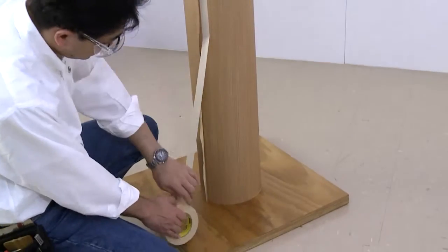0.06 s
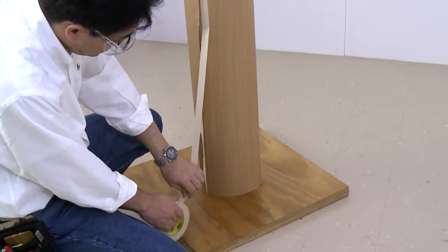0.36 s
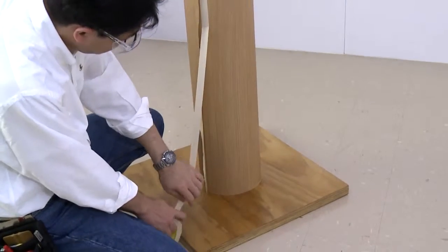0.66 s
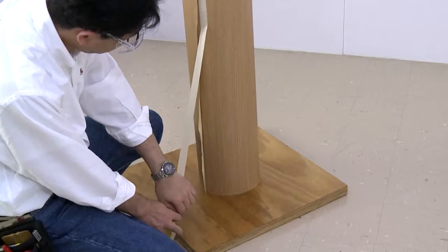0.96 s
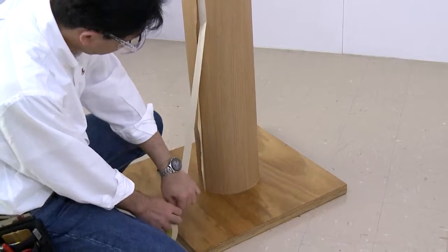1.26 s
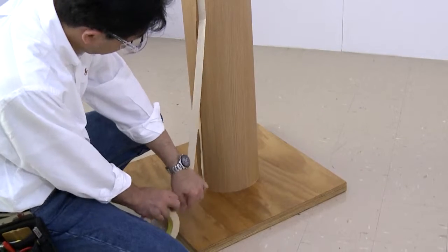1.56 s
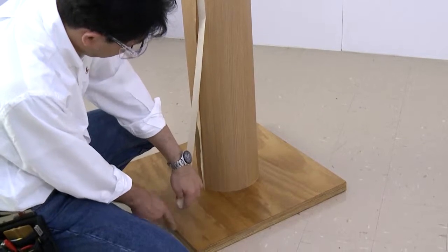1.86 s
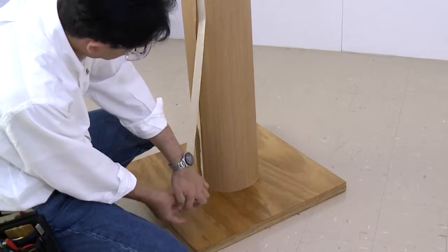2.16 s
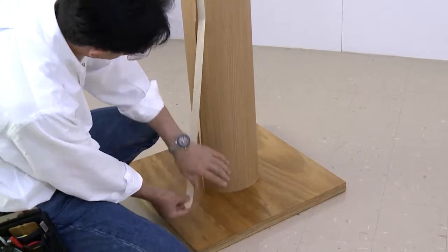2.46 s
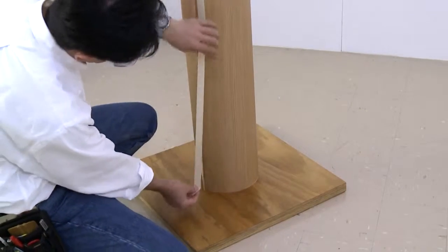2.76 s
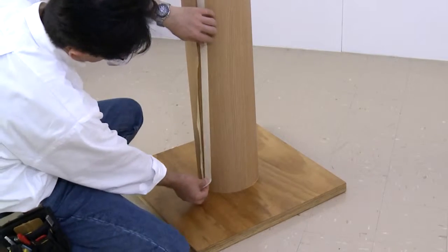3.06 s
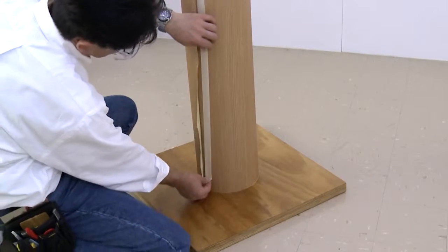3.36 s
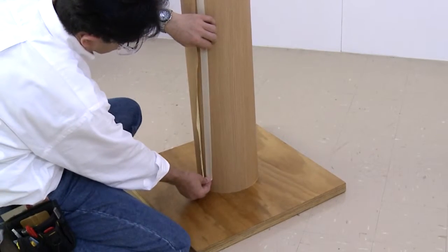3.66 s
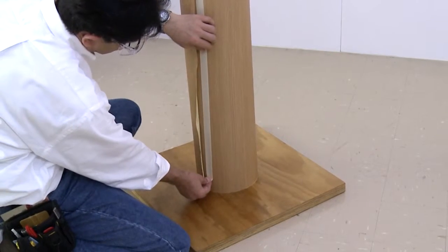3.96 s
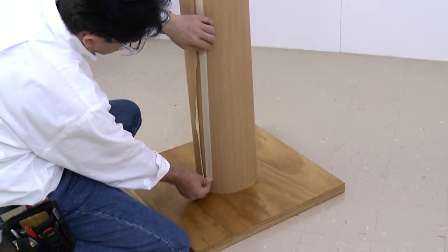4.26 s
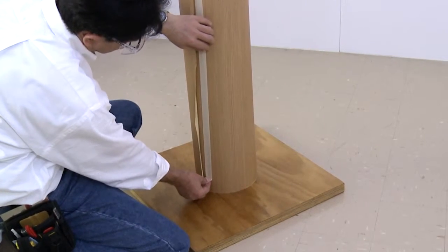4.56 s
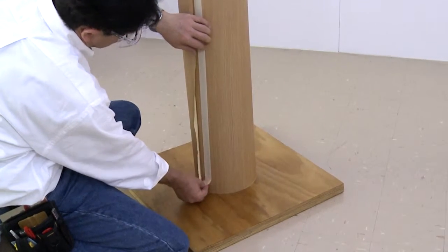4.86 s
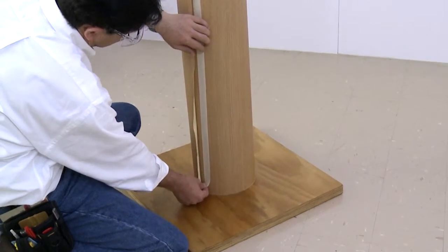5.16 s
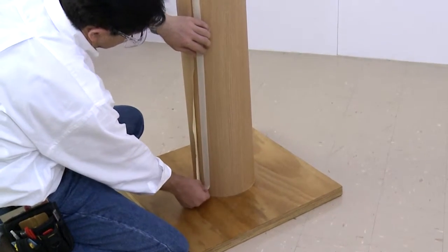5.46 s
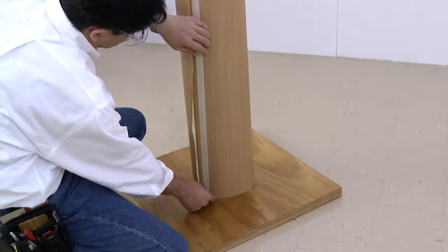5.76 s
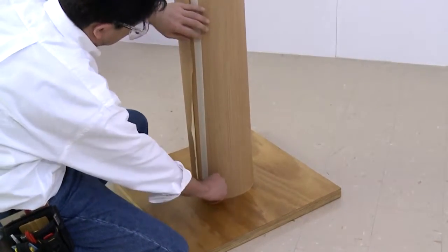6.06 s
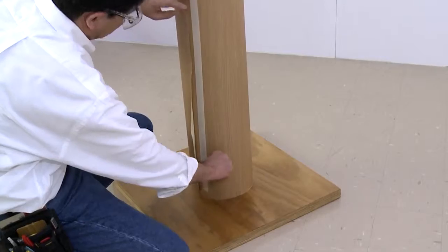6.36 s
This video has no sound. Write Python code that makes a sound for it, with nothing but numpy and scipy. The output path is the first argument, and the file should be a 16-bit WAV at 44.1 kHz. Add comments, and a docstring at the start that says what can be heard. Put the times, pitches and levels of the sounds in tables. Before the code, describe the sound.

Quiet masking tape rips, crinkles and snaps as hands stick it to a wooden column in a softly humming room.

```python
"""In a bare workroom, masking tape is pulled off its roll, torn, stretched down a hollow wooden column
and pressed on. The glue lets go in dense tiny pops, the taut paper snaps and crinkles, and knuckles
bump the wood. Fingers, palm and shirt sleeves sound by friction. The room answers over softly rushing
ventilation; two spaced microphones listen from a few steps away."""
import sys
import numpy as np
from scipy import signal
from scipy.fft import rfft, irfft, next_fast_len
from scipy.io import wavfile
from scipy.ndimage import map_coordinates

SR = 44100
rng = np.random.default_rng(int(sys.argv[2]) if len(sys.argv) > 2 else 0)


def dump(signal):
    """Clip the signal to [-1, 1] and save it as 16-bit WAV at the path in sys.argv[1]."""
    limited = np.clip(np.atleast_2d(signal).T, -1, 1)
    pcm = np.round(limited * 32767).astype(np.int16)
    wavfile.write(sys.argv[1], SR, pcm)


N = 287506
TIME = np.arange(N) / SR
BINS = np.fft.rfftfreq(2048, 1 / SR)

# Levels are relative, before the mix. Source spectra: (frequency [Hz], level [dB])
AIR_SPECTRUM = [(15, -81), (25, -45), (149, -52), (236, -31.5), (277, -30), (309, -20.5), (384, -14.5),
                (427, -9.5), (476, -5.5), (962, -4), (1480, -8.5), (1610, -8.5), (2220, -10.5),
                (3520, -15.5), (16000, -25.5)]
CLOTH_SPECTRUM = [(110, -86.5), (180, -57.5), (381, -20), (427, -9.5), (824, -4), (1650, -8), (2450, -3),
                  (5000, -16), (7840, -28), (11000, -17.5), (16000, -25)]
FINGER_SPECTRUM = [(880, -59), (1500, -15.5), (2020, -18), (3120, -3), (3840, -1.5), (5170, -8), (10000, 0),
                   (10900, 4), (16000, 1)]  # skin on crepe paper
TAPE_SPECTRUM = [(120, -103), (200, -73), (278, -71), (394, -42.5), (600, -19), (806, -19.5), (1100, -14),
                 (1560, -15), (1850, -10.5), (2250, -8), (2450, -6), (3150, -9), (3690, -8.5), (4600, -14),
                 (5800, -12.5), (8000, -10.5), (10700, -6.5), (16000, -10.5)]
ROLL_COLOUR = [(400, -6), (650, 1.5), (1000, 4), (1550, -3.5), (2500, -1), (3500, 0.5), (6000, 1)]  # what the roll adds to the peeling tape
CORE_SPECTRUM = [(300, -90), (1200, -46), (2150, -21), (2400, -5), (2530, 1), (2680, -2), (3000, -18.5),
                 (5000, -48)]
PLYWOOD_SPECTRUM = [(200, -56), (400, -24), (650, -2), (830, 0.5), (1050, -1), (1300, -18.5), (2500, -10.5),
                    (5000, -45.5), (9000, -69.5)]
PALM_SPECTRUM = [(200, -55.5), (400, -11.5), (620, 0.5), (1000, -2.5), (1600, -8), (2500, -2), (3700, -7.5),
                 (5000, -18.5), (8000, -26.5), (11000, -22), (16000, -25.5)]
SCRAPE_SPECTRUM = [(200, -77), (500, -33), (1000, -5), (1380, -6), (1600, 0), (1950, -3.5), (2600, 0.5),
                   (3300, -6.5), (4000, 1.5), (4750, 3), (5700, -7), (6400, 2.5), (7700, -14), (8900, -2),
                   (10200, -11), (12300, -18), (14600, -13), (16000, -28)]
# Friction strokes: (time [s], duration [s], level [dB])
SLEEVE_STROKES = [(0.1, 0.53, -65.5), (0.62, 0.29, -65.5), (1.15, 0.49, -68), (1.74, 0.17, -65.5),
                  (2.13, 0.44, -63.5), (2.5, 0.75, -65.5), (3.41, 0.052, -65.5), (4.72, 0.26, -69),
                  (5.1, 0.35, -70), (5.88, 0.42, -67.5)]
FINGER_STROKES = [(0.31, 0.26, -63), (0.73, 0.22, -69.5), (1.25, 0.051, -60), (1.285, 0.115, -53.5),
                  (1.47, 0.084, -62), (2.374, 0.021, -51.5), (2.40, 0.06, -62), (2.52, 0.18, -60),
                  (5.175, 0.032, -69), (5.87, 0.058, -68.5), (6.08, 0.047, -69.5), (6.2, 0.39, -71.5)]
CORE_STROKES = [(0.436, 0.036, -37.5)]
PALM_STROKES = [(3.05, 0.3, -61), (6.23, 0.35, -61.5), (6.41, 0.056, -61.5)]
SCRAPE_STROKES = [(3.617, 0.03, -68), (3.879, 0.063, -52.5)]
# Buckling paper: (time [s], level [dB], body gain [dB], fizz gain [dB], centre frequency [Hz])
PAPER_CRINKLES = [(0.1456, -49, 1, -2, 3600), (0.2305, -42.5, -8, -9, 11100),
                  (0.2374, -36.5, -3.5, -4.5, 1900), (0.391, -34.5, 0, -6, 1750),
                  (0.7052, -38.5, 1, -5, 2200), (0.9443, -40.5, -5, 2, 10700), (1.3104, -51, -7, 6, 11000),
                  (1.334, -49, -7, 4, 10000), (1.3885, -42.5, -3, 5, 10900), (1.4005, -45.5, -6, 5, 12000),
                  (1.8203, -44.5, -2, -3.5, 2120), (2.0138, -47, 3, -7.5, 2560),
                  (2.0950, -40, 7.5, -15, 2800), (2.4458, -36, 2, -7.5, 1700), (2.463, -32, 6.5, -8, 1500),
                  (2.9150, -46.5, -2, -1, 12500), (2.9200, -40.5, 3, -7, 2400),
                  (3.0589, -48, 14, -25, 2590), (3.1324, -53.5, -4, 1.5, 11000),
                  (3.4246, -51.5, 16.5, -29, 2500), (5.2350, -43.5, 6, -11, 2000),
                  (5.4125, -50.5, 9, -11, 4600)]
TAPE_SNAPS = [(0.39, -33.5, -6, -13, 2110), (0.7065, -42, -3, -8, 2400), (0.9454, -42, -6, 0, 10500),
              (1.3116, -47, -8, 5, 11100), (1.3935, -33, 1.5, 3.5, 10000), (1.4035, -37.5, -8, 3, 11700),
              (1.5884, -27.5, 0.5, -6, 1880), (1.593, -31.5, 1, -9, 3000), (1.5979, -31.5, 2, -21, 2000),
              (1.8205, -41, 1.5, -9, 2290), (2.0839, -36, 0.5, -14.5, 2900), (2.4668, -35.5, 3, 3, 10600),
              (2.478, -39, -2, 0, 1900), (2.9140, -35.5, -2, 2.5, 11500), (2.923, -44, -2, 3, 13200),
              (2.9312, -34.5, 7, -19, 2400), (3.868, -50, -1, -11, 1900), (3.8803, -45.5, -2, -0.5, 7000),
              (4.754, -45, 4, -22, 2700), (4.8619, -45.5, 7, -5, 2000), (4.924, -36, 0, -23, 2290),
              (4.927, -22, 2.5, -8.5, 4600), (4.931, -31, 4, -17, 3700), (4.9365, -32.5, 6, -19, 3400),
              (4.965, -29.5, 1, -22, 2500), (4.9785, -33, 4.5, -26, 2000), (5.0422, -35.5, -6, -20, 2780),
              (5.0590, -31, 1.5, -24, 2680), (5.2274, -38.5, 3.5, -9.5, 3420), (5.2377, -40.5, 5, -9, 4020),
              (5.7998, -28, -1.5, -8.5, 4650)]
# The one pull off the roll: (time [s], peeling effort [dB], body level [dB])
PULL_CURVE = [(0.392, -52, -76), (0.43, -46.5, -58), (0.475, -39, -55), (0.493, -36.5, -41),
              (0.539, -35, -49.5), (0.58, -48.5, -56.5)]
# Short rips: (time [s], duration [s], paper level [dB], body level [dB], fizz level [dB],
# opening burst [dB], strip resonance [Hz], resonance height [dB])
TAPE_RIPS = [(1.587, 0.065, -51.5, -57, -48, 5.5, 2180, 1.5), (4.93, 0.055, -59, -57.5, -63, 2.5, 3300, 0),
             (5.806, 0.059, -51.5, -55, -61, 0.5, 2550, 6)]
# Tape slipping on the column: (time [s], pitch [Hz], half-width [s], level [dB])
TAPE_SQUEAKS = [(2.085, 2720, 0.0007, -51), (5.415, 2750, 0.0017, -53)]
# Knuckles on plywood: (time [s], level [dB])
KNUCKLE_BLOWS = [(2.086, -16.5), (2.198, -16.5), (2.284, -7.5), (2.295, -20), (2.93, -11), (3.318, -15),
                 (3.425, -19)]
# Likeness of left and right: (frequency [Hz], correlation [-1 to 1])
AIR_COHERENCE = [(100, 0.71), (300, 0.99), (1000, 0.91), (2400, 0.55), (3800, -0.42), (6000, -0.54),
                 (15000, 0.43)]
ROOM_COHERENCE = [(300, 1), (900, .94), (2300, .7), (3100, 0.15), (4200, -0.72), (5300, -0.55),
                  (6500, 0.27), (15000, -0.42)]
# Direct sound at the microphones: (frequency [Hz], phase lead of the left [rad])
LEFT_LEAD = [(2600, 0.58), (3400, 4.9), (5200, 3.94), (6300, 5.4), (10000, 5.15), (16000, 4.7)]
# Decay of the room: (frequency [Hz], reverberation time [s])
ROOM_T60 = [(300, 0.37), (1000, 0.39), (2500, 0.41), (6000, 0.33), (15000, 0.26)]


def amp(db):
    """Decibels as an amplitude ratio."""
    return 10 ** (np.asarray(db) / 20)


def unit(x):
    """Normalisation to rms 1."""
    return x / np.sqrt(np.mean(x ** 2) + 1e-20)


def along(points, hz):
    """Interpolation on a logarithmic frequency axis."""
    freqs, values = np.transpose(points)
    return np.interp(np.log(hz + 1), np.log(freqs + 1), values)


def wobble(rate):
    """Smooth random modulation, rate knots a second."""
    return map_coordinates(rng.standard_normal(int(N * rate / SR) + 4), [TIME * rate])


def filtered(x, response):
    """Linear filtering: the spectrum times a frequency response."""
    size = next_fast_len(x.shape[-1] + 8192)
    return irfft(rfft(x, size) * response(np.fft.rfftfreq(size, 1 / SR)), size)[..., :x.shape[-1]]


def ring(gain):
    """The minimum-phase impulse response of a gain over BINS."""
    cepstrum = irfft(np.log(np.maximum(gain / gain.max(), 1e-6)))
    half = len(cepstrum) // 2
    cepstrum[1:half] *= 2
    cepstrum[half + 1:] = 0
    return gain.max() * irfft(np.exp(rfft(cepstrum)))


def resonance(centre_hz, db, octaves):
    """A bell-shaped peak, in dB over BINS."""
    return db * np.exp(-(np.log2((BINS + 1) / centre_hz) / octaves) ** 2)


def pops(rate, spread_db):
    """Shot noise: rate impulses a second, of uneven size."""
    size = amp(spread_db * rng.standard_normal(N).clip(-2.5, 2.5))
    return unit((rng.random(N) < rate / SR) * size * rng.choice([-1, 1], N))


def spaced(pair, coherence):
    """Partial coherence: two independent noises mix as mid and side into left and right."""
    def weights(hz):
        angle = np.arccos(np.clip(along(coherence, hz), -.99, .99)) / 2
        return np.array([np.cos(angle), np.sin(angle)])
    mid, side = filtered(pair, weights)
    return np.array([mid + side, mid - side])


def ventilation(level_db=-64.8):
    """Moving air fills the room with stationary broadband noise."""
    noise = spaced(rng.standard_normal((2, N)), AIR_COHERENCE)
    return amp(level_db) * unit(filtered(noise, lambda hz: amp(along(AIR_SPECTRUM, hz))))


def stroke(start, length, rise, fall):
    """Envelope of a motion that speeds up, holds and slows; rise and fall are shares of its length."""
    progress = (TIME - start) / length
    return np.sin(np.pi / 2 * np.minimum(progress / rise, (1 - progress) / fall).clip(0, 1))


def friction(strokes, spectrum, rate, spread_db, catch_db, rise, fall):
    """Sliding friction: fibres catch and let go, and the surface filters their impulses."""
    grains = pops(rate, spread_db) * amp(catch_db * np.tanh(wobble(45)))
    rubbing = signal.fftconvolve(grains, ring(amp(along(spectrum, BINS))))[:N]
    return unit(rubbing) * sum(amp(db) * stroke(s, length, rise, fall) for s, length, db in strokes)


def sleeves():
    """Friction of brushing cloth makes a soft rustle."""
    return friction(SLEEVE_STROKES, CLOTH_SPECTRUM, rate=2500, spread_db=1.5, catch_db=3,
                    rise=0.38, fall=0.37)


def tape_bands(tint_db=0, low_hz=1550, high_hz=5000):
    """A pop's spectrum in three bands of equal energy: paper (mid), body (low), fizz (high)."""
    below = lambda edge: 1 / (1 + (BINS / edge) ** 8)
    shares = [below(high_hz) - below(low_hz), below(low_hz), 1 - below(high_hz)]
    colour = amp(along(TAPE_SPECTRUM, BINS) + tint_db)
    return np.array([unit(colour * np.sqrt(np.abs(share))) for share in shares])


def buckles(events, release, rise_s, t60, paper_db, fizz_db, focus_db, octaves):
    """Buckling: one release, then a dying shower of creases; patch size sets the strongest frequency."""
    t = np.arange(SR // 10) / SR
    envelope = (1 - np.exp(-t / rise_s)) * amp(-60 * t / t60)
    bands = tape_bands()
    sound = np.zeros(N + SR)
    for s, db, body_db, high_db, centre_hz in events:
        force = rng.standard_normal(len(t)) * rng.random(len(t)) ** 2 * envelope
        force[0] = release * np.linalg.norm(force)
        colour = np.sqrt(amp([paper_db, body_db, fizz_db + high_db]) ** 2 @ bands ** 2)
        patch = amp(resonance(centre_hz, focus_db, octaves))
        colour = unit(colour * patch) * np.sqrt(np.mean(colour ** 2))
        buckle = amp(db) * signal.fftconvolve(force / np.linalg.norm(force), ring(colour))
        sound[round(s * SR):][:len(buckle)] += buckle
    return sound[:N]


def crinkles():
    """Paper buckles gradually between the fingers, in soft crackles."""
    return buckles(PAPER_CRINKLES, release=0.13, rise_s=0.0026, t60=0.024,
                   paper_db=11.5, fizz_db=16.5, focus_db=5.5, octaves=0.45)


def fingers():
    """Friction of skin on crepe paper makes a grainy hiss."""
    return friction(FINGER_STROKES, FINGER_SPECTRUM, rate=1800, spread_db=6, catch_db=4,
                    rise=0.3, fall=0.13)


def snaps(rebound_s=0.011, rebound_db=-17.5):
    """Sudden buckling cracks the taut strip, which flaps back after every snap."""
    rebounds = [(s + rebound_s, db + rebound_db, *colour) for s, db, *colour in TAPE_SNAPS]
    return buckles(TAPE_SNAPS + rebounds, release=1.25, rise_s=0.00022, t60=0.0058,
                   paper_db=7.5, fizz_db=12, focus_db=6.5, octaves=0.7)


def glue_threads(rate, spread_db, judder_db, judder_rate, ratchet_db, ratchet_hz):
    """Stick-slip at the peel line modulates the pops of breaking glue threads."""
    slips = np.cos(2 * np.pi * (ratchet_hz * TIME + 0.29 * wobble(50)))
    return pops(rate, spread_db) * unit(amp(judder_db * wobble(judder_rate) + ratchet_db * slips))


def held(start, end, stop_s=0.0032):
    """A gate, open while the tape runs, then decaying exponentially."""
    return (TIME >= start) * np.exp(-(TIME - end).clip(0) / stop_s)


def peel(glue, gains, tint_db):
    """Source and filter: breaking glue excites paper, body and fizz, each with its own gain."""
    bands = tape_bands(tint_db)
    return sum(signal.oaconvolve(glue * gain, ring(band))[:N] for gain, band in zip(gains, bands))


def unrolling():
    """Adhesive fracture at the roll: the paper band saturates early, the body surges with the tug."""
    glue = glue_threads(rate=9000, spread_db=1.5, judder_db=1.5, judder_rate=300,
                        ratchet_db=4, ratchet_hz=116)
    times, efforts, bodies = np.transpose(PULL_CURVE)
    effort_db = np.interp(TIME, times, efforts)
    shortfall_db = np.minimum(effort_db - efforts.max() + 3, 0)  # saturates 3 dB below peak effort
    paper_db = efforts.max() + 1.4 + 0.96 * shortfall_db
    body_db = np.interp(TIME, times, bodies)
    fizz_db = effort_db + 4.5
    gains = amp([paper_db, body_db, fizz_db]) * held(times[0], times[-1])
    return peel(glue, gains, along(ROLL_COLOUR, BINS))


def roll_core():
    """The cardboard core resonates as the peel picks up speed."""
    return friction(CORE_STROKES, CORE_SPECTRUM, rate=8000, spread_db=-1, catch_db=4.8,
                    rise=0.3, fall=0.26)


def rips(settle_s=0.04):
    """Fracture starts hard, then settles; each free length of strip has its own resonance."""
    glue = glue_threads(rate=6000, spread_db=2, judder_db=2.5, judder_rate=420,
                        ratchet_db=4.5, ratchet_hz=214)
    sound = np.zeros(N)
    for s, length, paper_db, body_db, fizz_db, burst_db, strip_hz, strip_db in TAPE_RIPS:
        run = held(s, s + length)
        burst = run * amp(burst_db * np.exp(-(TIME - s).clip(0) / settle_s))
        gains = [amp(paper_db) * burst, amp(body_db) * burst, amp(fizz_db) * run]
        sound += peel(glue, gains, resonance(strip_hz, strip_db, octaves=0.19))
    return sound


def squeaks(jitter=0.041):
    """Stick-slip turns periodic for a few milliseconds and makes a pitch."""
    clock = TIME + jitter * np.cumsum(wobble(700)) / SR
    return sum(amp(db) * np.exp(-((TIME - s) / width) ** 2) * np.sin(2 * np.pi * hz * clock)
               for s, hz, width, db in TAPE_SQUEAKS)


def knocks():
    """Impacts of the knuckles excite a brief, damped vibration of the plywood."""
    blows = np.zeros(N)
    for s, db in KNUCKLE_BLOWS:
        blows[round(s * SR)] = amp(db)
    return signal.oaconvolve(blows, ring(amp(along(PLYWOOD_SPECTRUM, BINS))))[:N]


def palm():
    """Friction of a hand rubbing the tape down sounds through the column."""
    return friction(PALM_STROKES, PALM_SPECTRUM, rate=6000, spread_db=2, catch_db=3.5,
                    rise=0.34, fall=0.44)


def scrapes():
    """A brief scuff of friction gives an abrupt, hollow hiss."""
    return friction(SCRAPE_STROKES, SCRAPE_SPECTRUM, rate=9000, spread_db=2, catch_db=4.5,
                    rise=0.023, fall=0.57)


def direct(x, floor_db=-10, floor_delay_s=0.0039, wander_s=0.0002):
    """The straight path interferes with a floor reflection whose delay drifts as the hands move."""
    bounce = map_coordinates(x, [(TIME - floor_delay_s - wander_s * wobble(4)) * SR])
    phase_shift = lambda hz: np.exp(.5j * along(LEFT_LEAD, hz) * np.array([[1], [-1]]))
    return filtered(x + amp(floor_db) * bounce, phase_shift)


def room(x, early_db=3, early_t60=0.12, build_s=0.0025, steps=32):
    """Reverberation: early reflections, then a diffuse tail; both change as the hands move."""
    out = np.zeros((2, N + 2 * SR))
    hop = N // steps
    for k in range(steps + 1):
        start = max(k - 1, 0) * hop
        offset = np.arange(N)[start:(k + 1) * hop] - k * hop
        crossfade = np.cos(np.pi / 2 * np.clip(offset / hop, -1, 1))
        segment = x[start:][:len(crossfade)] * crossfade
        hz, t, noise = signal.stft(rng.standard_normal((2, SR // 3)), SR, nperseg=256)
        tail = signal.istft(noise * amp(-60 * t / along(ROOM_T60, hz)[:, None]), SR, nperseg=256)[1]
        age = np.arange(tail.shape[1]) / SR
        onset = 1 - np.exp(-age / build_s)
        early = 1 + amp(early_db - 60 * age / early_t60)
        tail = spaced(tail * onset * early, ROOM_COHERENCE)
        wet = signal.fftconvolve(segment[None], tail / np.linalg.norm(tail[0]), axes=1)
        out[:, start:start + wet.shape[1]] += wet
    return out[:, :N]


def scene():
    """Superposition of tape, hands and wood, direct and reverberant, over the ventilation."""
    air = ventilation()
    soft = amp(-1) * sleeves() + crinkles() + amp(0.5) * fingers()
    soft += unrolling() + roll_core() + rips() + knocks() + palm()
    sharp = snaps() + squeaks()
    scraping = scrapes()
    # the taut strip beams its snaps at the microphones; the scrapes arrive mostly through the room
    near = direct(amp(2.5) * sharp + amp(-2.5) * soft + amp(-8) * scraping)
    reverb = room(amp(-2.2) * sharp + amp(0.44) * soft + amp(1) * scraping)
    return (near + reverb) * amp([[-2.4], [2.2]]) + air * amp([[-2.1], [2]])


def record(dry, top_hz=16100):
    """Band limiting: a steep low-pass removes the highest treble."""
    return filtered(dry, lambda hz: 1 / (1 + (hz / top_hz) ** 160))


dry = scene()
out = record(dry)
dump(out)
```